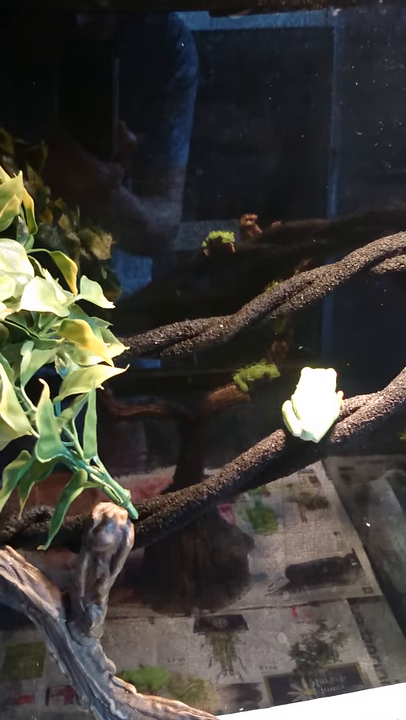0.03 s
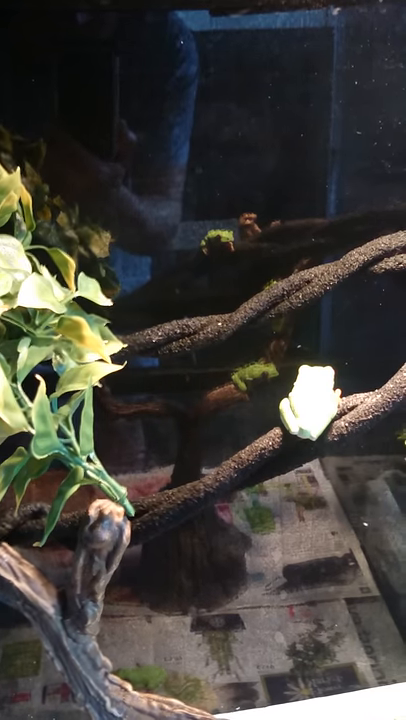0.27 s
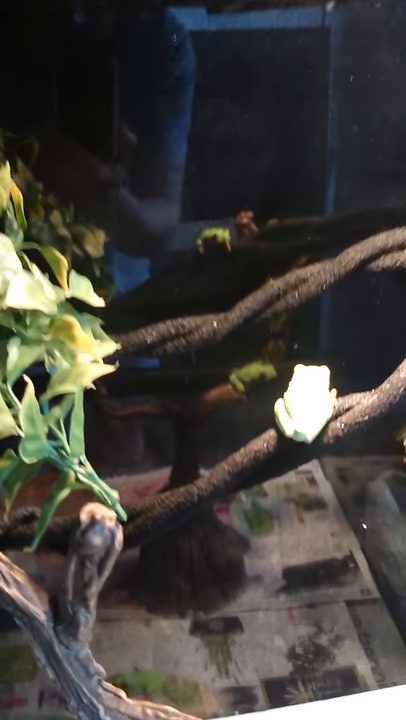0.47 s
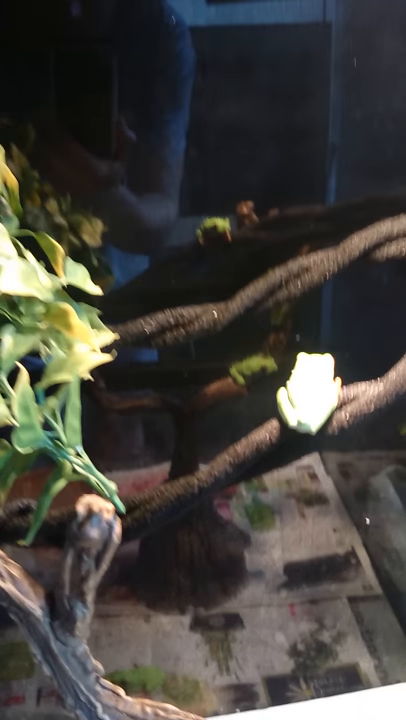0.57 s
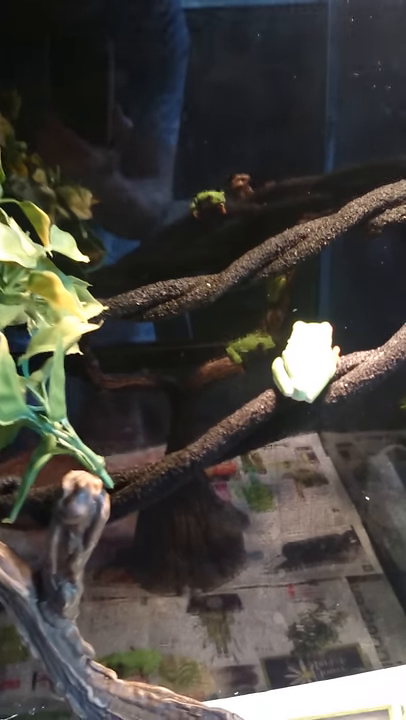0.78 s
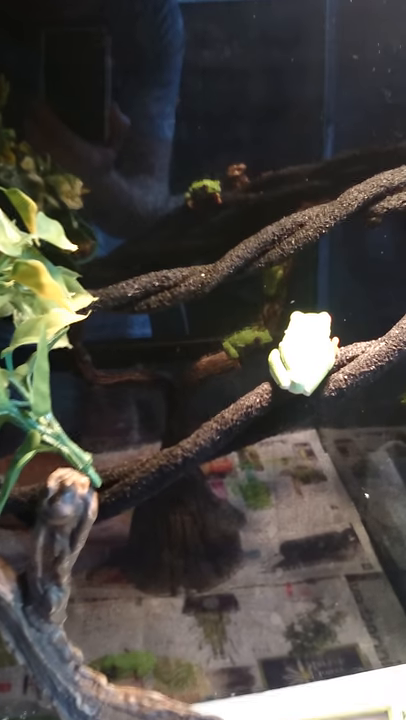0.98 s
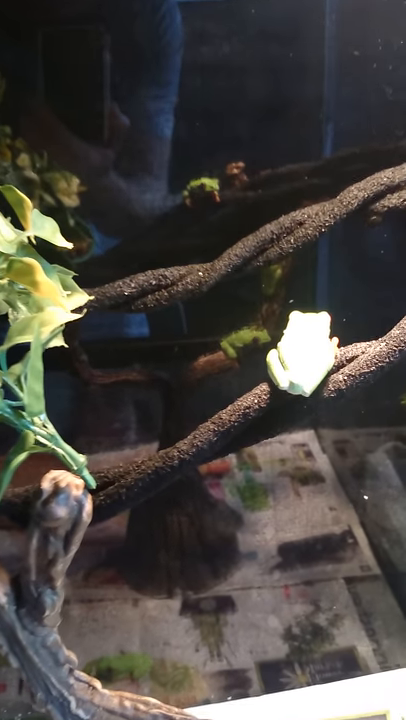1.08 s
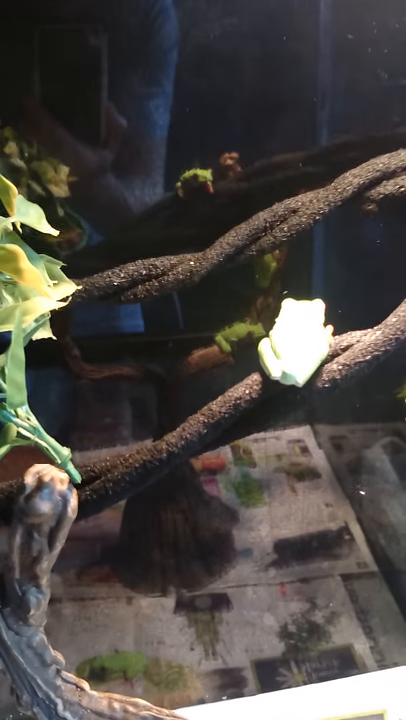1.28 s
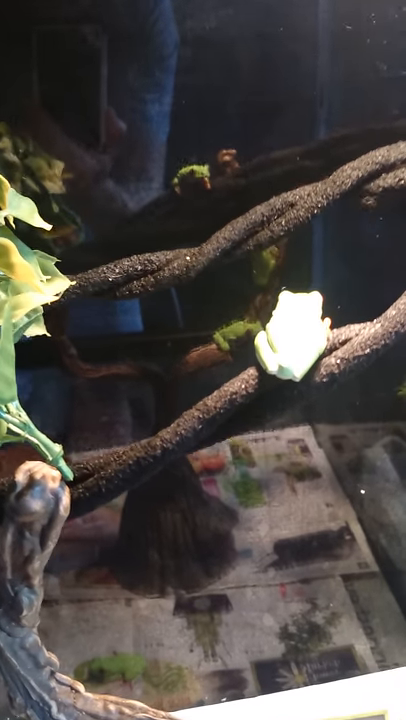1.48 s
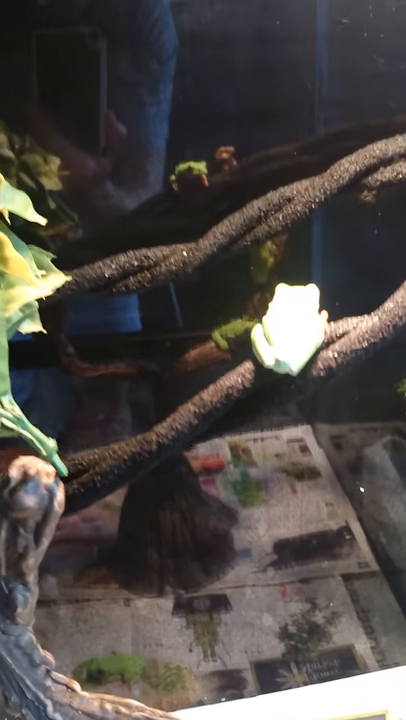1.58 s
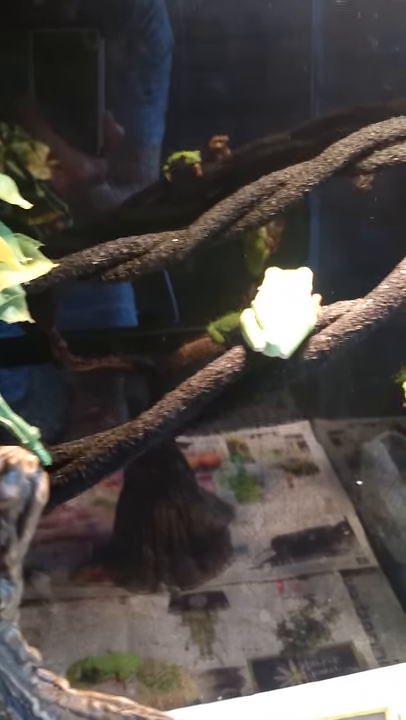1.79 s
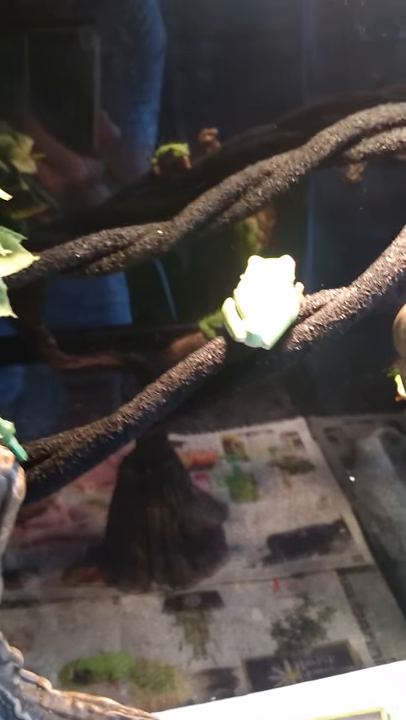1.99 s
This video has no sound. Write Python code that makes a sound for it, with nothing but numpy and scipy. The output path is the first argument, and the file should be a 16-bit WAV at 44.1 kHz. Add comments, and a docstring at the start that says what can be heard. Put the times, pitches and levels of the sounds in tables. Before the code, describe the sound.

A steady, low hiss of indoor air comes in after a soft switch-on pop. The hand holding the microphone rumbles and bumps lightly near a terrarium, while a thin buzz and tiny regular electronic pips leak into the right side.

```python
"""A soft pop, then the air hiss of a quiet room beside a terrarium: a hand-held camera's microphones
switch on. The hand rumbles and rustles on the case; its bumps click and ring the case's modes.
One faint tick sounds among them. The camera's electronics leak a thin buzz and a regular
tiny chirp into the right channel."""
import sys
import numpy as np
from scipy.fft import rfft, irfft, next_fast_len
from scipy.io import wavfile

SR = 44100
rng = np.random.default_rng(int(sys.argv[2]) if len(sys.argv) > 2 else 0)


def transcribe(u):
    """Save the signal u as a 16-bit wav file named by the first command-line argument.

    u: samples, shape (n,) or (channels, n), limited to [-1, 1]; the rate is SR.
    q: integer samples, one column per channel.
    """
    v = np.clip(np.atleast_2d(u).T, -1, 1)
    q = np.round(v * 32767).astype(np.int16)
    wavfile.write(sys.argv[1], SR, q)


N = 90404
TIME_S = np.arange(N) / SR
SWITCH_ON_S = .2202


def amp(db):
    """Decibels to gain."""
    return 10 ** (np.asarray(db) / 20)


def unit_rms(x):
    """Scale to rms 1."""
    return x / np.sqrt(np.mean(x ** 2) + 1e-20)


def curve_at(points, hz):
    """Interpolate (f/Hz, value) points on a log axis."""
    knots_hz, values = np.transpose(points)
    return np.interp(np.log(hz + 1), np.log(knots_hz + 1), values)


def envelope(points):
    """Gain per sample from (t/s, level/dB) points."""
    return amp(np.interp(TIME_S, *np.transpose(points)))


def pan(db):
    """Stereo gains for a left-minus-right level."""
    return amp([[db / 2], [-db / 2]])


def bell(offset_s, width_s):
    """Gaussian envelope around offset 0."""
    return np.exp(-.5 * (offset_s / width_s) ** 2)


def decay(start_s, t60_s):
    """Sudden onset, exponential decay."""
    age_s = TIME_S - start_s
    return (age_s >= 0) * amp(-60 * np.maximum(age_s, 0) / t60_s)


def filtered(x, response):
    """Apply a frequency response by zero-padded FFT."""
    size = next_fast_len(N + SR // 2)
    hz = np.fft.rfftfreq(size, 1 / SR)
    return irfft(rfft(x, size) * response(hz), size)[..., :N]


def noise(spectrum):
    """Noise from (f/Hz, density/dB) points, low-passed an octave above the last."""
    corner_hz = 2 * spectrum[-1][0]
    white = rng.standard_normal(N) * np.sqrt(SR / 2)
    return filtered(white, lambda hz: amp(curve_at(spectrum, hz)) / (1 + (hz / corner_hz) ** 4))


# Left-right coherence: f/Hz, correlation
COHERENCE = [(60, 0.69), (300, 0.49), (640, 0.36), (1400, 0.017), (4000, 0.017)]

def stereo_noise(spectrum):
    """Noise alike on both sides in the bass, unrelated in the treble."""
    angle = lambda hz: np.arccos(np.clip(curve_at(COHERENCE, hz), -1, 1)) / 2
    mid = filtered(noise(spectrum), lambda hz: np.cos(angle(hz)))
    side = filtered(noise(spectrum), lambda hz: np.sin(angle(hz)))
    return np.array([mid + side, mid - side])


# Room air: f/Hz, density/dB
AIR_SPECTRUM = [(90, -89), (145, -87), (195, -99), (270, -91.5), (335, -90), (470, -95), (680, -93.5),
                (950, -99), (1350, -101), (1900, -102), (2700, -98.5), (3450, -100.5), (3950, -103.5),
                (4900, -104.5), (6000, -112), (7200, -125)]
# Air resonances: f/Hz, width/Hz, level/dB
AIR_RESONANCES = [(342.3, 51, -75.5), (665, 46, -73.5), (1273, 17, -77.5), (3448, 25, -77)]
# Slow drift of air and buzz: t/s, gain/dB
LEVEL_DRIFT = [(.3, 1.1), (.6, 0.9), (.9, 2), (1.05, 1.5), (1.55, 2), (1.84, 0.96), (1.94, -0.5),
               (2.04, -2)]

def room_air():
    """Broad hiss with narrow resonances, drifting in level."""
    resonances = np.zeros((2, N))
    for hz, width_hz, db in AIR_RESONANCES:
        peak = [(hz - 2 * width_hz, -60), (hz - width_hz / 2, -4), (hz, 0),
                (hz + width_hz / 2, -4), (hz + 2 * width_hz, -60), (hz + 4 * width_hz, -120)]
        resonances += amp(db) * unit_rms(stereo_noise(peak))
    return envelope(LEVEL_DRIFT) * (stereo_noise(AIR_SPECTRUM) + resonances)


# Hums: t/s, f/Hz, level/dB, half-width/s
BRIEF_HUMS = [(0.267, 325, -59.5, 0.016), (0.288, 480, -63.5, 0.014), (1.16, 100, -62, 0.018),
              (2.015, 361, -60, 0.017)]

def hums():
    """Faint low tones that swell briefly."""
    return sum(amp(db) * bell(TIME_S - at_s, width_s) * unit_rms(np.sin(2 * np.pi * hz * TIME_S))
               for at_s, hz, db, width_s in BRIEF_HUMS)


# Electrical burst: f/Hz, gain/dB
BURST_SPECTRUM = [(200, -25), (850, -1), (1300, -7), (1700, -5.5), (2550, -2.5), (3400, 2), (4250, 2),
                  (4700, -2), (5150, 4), (5550, -4), (5850, 4), (6200, 3.5), (6700, -5), (7150, -9),
                  (7550, -12), (9000, -60)]
# Electrical sizzle: f/Hz, density/dB
SIZZLE_SPECTRUM = [(600, -112), (1100, -99), (1600, -95), (2200, -99), (3400, -103), (4450, -102),
                   (5000, -97), (5600, -91), (6200, -97), (7000, -107), (7700, -122)]

def electrical_buzz(rate_hz=93.75, buzz_db=-60.5, scatter_db=.5, surge_depth=.3):
    """Each cycle leaks the same ragged burst and a weaker repeat; a sizzle surges in step."""
    burst_at_s, burst_width_s = .0065, .00065
    repeat_s, repeat_db = .00236, -5
    cycles_s = np.arange(int(N / SR * rate_hz)) / rate_hz
    strengths = amp(scatter_db * rng.standard_normal(len(cycles_s)))
    pulses = np.bincount(np.round(cycles_s * SR).astype(int), strengths, N)
    burst = bell(TIME_S - burst_at_s, burst_width_s) * rng.standard_normal(N)
    # Phase from the noise burst, magnitude from the table.
    phase = lambda hz: np.exp(1j * np.angle(rfft(burst, 2 * len(hz) - 2)))
    repeat = lambda hz: 1 + amp(repeat_db) * np.exp(-2j * np.pi * hz * repeat_s)
    bursts = filtered(pulses, lambda hz: phase(hz) * repeat(hz) * amp(curve_at(BURST_SPECTRUM, hz)))
    surge = 1 + surge_depth * bell(TIME_S % (1 / rate_hz) - burst_at_s, burst_width_s)
    sizzle = unit_rms(surge) * noise(SIZZLE_SPECTRUM)
    return envelope(LEVEL_DRIFT) * (amp(buzz_db) * unit_rms(bursts) + sizzle)


def electrical_chirps(anchor_s=.3485, period_s=.2667, hz=4950, peak_db=-47.5, width_s=.0011):
    """Tiny fixed-pitch pips of interference, nearly four a second."""
    offset_s = (TIME_S - anchor_s + period_s / 2) % period_s - period_s / 2
    return amp(peak_db) * bell(offset_s, width_s) * np.sin(2 * np.pi * hz * offset_s)


def tick(at_s=1.103, level_db=-52, t60_s=.004, pan_db=7):
    """One tiny dry tick, left of centre."""
    return amp(level_db) * pan(pan_db) * decay(at_s, t60_s) * rng.standard_normal((2, N))


# Grip rustle: f/Hz, density/dB
RUSTLE_SPECTRUM = [(800, -106), (1130, -94.5), (1350, -88), (1700, -103.5), (2050, -112)]
# Rubbing strength: t/s, gain/dB
RUB_GAIN = [(.23, -7), (.29, 1), (.38, -2), (1.2, -35), (1.35, -2), (1.6, -8.5), (1.75, -26)]

def grip_rustle(pan_db=-3):
    """The hand rubs faintly on the case."""
    return envelope(RUB_GAIN) * pan(pan_db) * stereo_noise(RUSTLE_SPECTRUM)


# Hand rumble: f/Hz, density/dB
RUMBLE_SPECTRUM = [(4, -135), (12, -45), (25, -72.5), (45, -68.5), (70, -73), (110, -88.5), (200, -90.5),
                   (500, -125)]
# Rumble balance: f/Hz, left minus right/dB
RUMBLE_BALANCE = [(10, -13.5), (30, 18), (55, -9.5), (150, -2)]
# Grip pressure: t/s, gain/dB
GRIP_PRESSURE = [(.25, -21), (.32, -2), (.39, 3.5), (.55, -3), (.64, 0.5), (.8, 0), (1.05, -6.5),
                 (1.25, -6.5), (1.42, -6.5), (1.55, -9.5), (1.78, -6.5), (2.0, -6)]

def grip_rumble(fade_in_s=.06):
    """The grip rumbles through the case, fading in after switch-on."""
    balance = lambda hz: amp(np.outer([.5, -.5], curve_at(RUMBLE_BALANCE, hz)))
    rumble = filtered(stereo_noise(RUMBLE_SPECTRUM), balance)
    fade_in = np.clip((TIME_S - SWITCH_ON_S) / fade_in_s, 0, 1)
    return fade_in * envelope(GRIP_PRESSURE) * rumble


# Case modes: f/Hz, level/dB, t60/s
CASE_MODES = [(43.7, -5, 0.17), (108.5, -9.5, 0.078), (125.4, -7, 0.049), (316, -16, 0.019),
              (455, -27, 0.055)]
# Contact click: f/Hz, gain/dB
CLICK_SPECTRUM = [(500, -20), (2000, -13), (3000, 2), (4500, 1), (5900, 8.5), (6400, 1), (7000, -19),
                  (9000, -17), (15000, -19)]
# Bumps: t/s, thud gain/dB, click gain/dB, contact/s, thud left minus right/dB
CASE_BUMPS = [(.443, -29, -48, .0007, -5), (.4715, -18, -36, .0015, -7.5), (.4885, -25, -90, .009, -2),
              (.905, -24, -90, .019, -4), (1.617, -46, -80, .002, 0), (1.762, -40, -90, .014, -4)]

def case_bumps(click_t60_s=.01, click_pan_db=-12):
    """Each bump clicks and rings the case; longer contact leaves only the lowest modes."""
    bumps = np.zeros((2, N))
    for at_s, thud_db, click_db, contact_s, thud_pan_db in CASE_BUMPS:
        ring = sum(amp(db) * decay(at_s, t60_s) * np.sin(2 * np.pi * hz * (TIME_S - at_s))
                   for hz, db, t60_s in CASE_MODES)
        thud = filtered(ring, lambda hz: np.exp(-(hz * contact_s) ** 2))
        burst = decay(at_s, click_t60_s) * rng.standard_normal(N)
        click = filtered(burst, lambda hz: amp(curve_at(CLICK_SPECTRUM, hz)))
        bumps += amp(click_db) * pan(click_pan_db) * click - amp(thud_db) * pan(thud_pan_db) * thud
    return bumps


def scene():
    """Room, tick and handling in both channels; interference on the right only."""
    mix = room_air() + hums() + grip_rumble() + grip_rustle() + case_bumps() + tick()
    mix[1] += electrical_buzz() + electrical_chirps()
    return mix


# Microphone self-noise: f/Hz, density/dB
MIC_NOISE_SPECTRUM = [(3000, -115), (7000, -113), (7700, -110), (9000, -113.5), (10500, -113),
                      (12200, -116), (13900, -112), (14600, -115.5), (15700, -118)]

def record(dry):
    """Band-limited microphones add their own noise and switch on with a pop: a settling offset."""
    pop_db, pop_pan_db, settle_s = -29.5, -16, .25
    band_limit_hz = 15750
    age_s = TIME_S - SWITCH_ON_S
    pop = -amp(pop_db) * pan(pop_pan_db) * np.exp(-np.maximum(age_s, 0) / settle_s)
    self_noise = np.array([noise(MIC_NOISE_SPECTRUM), noise(MIC_NOISE_SPECTRUM)])
    live = (age_s >= 0) * (dry + pop + self_noise)
    return filtered(live, lambda hz: hz < band_limit_hz)


dry = scene()
out = record(dry)
transcribe(out)
```